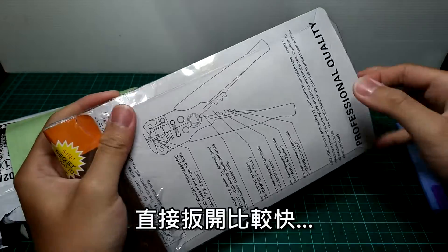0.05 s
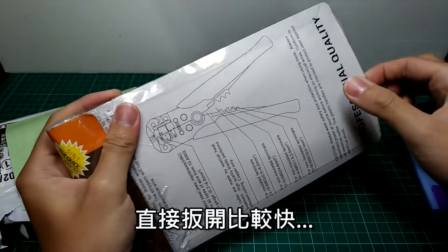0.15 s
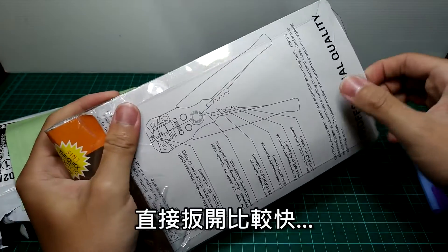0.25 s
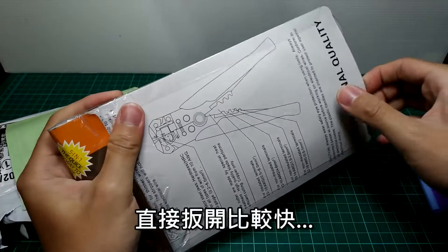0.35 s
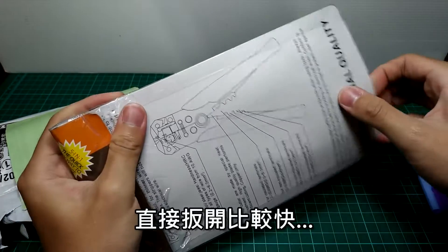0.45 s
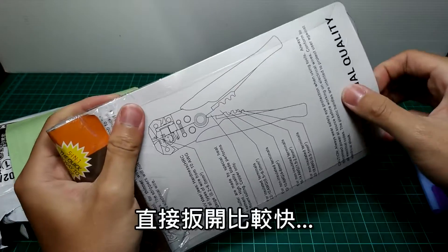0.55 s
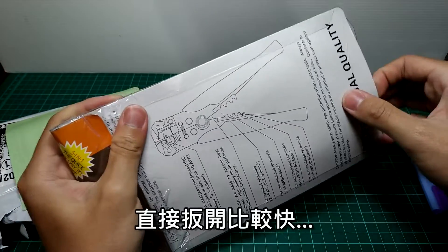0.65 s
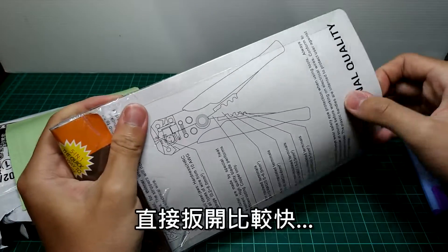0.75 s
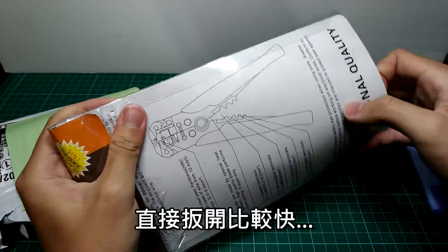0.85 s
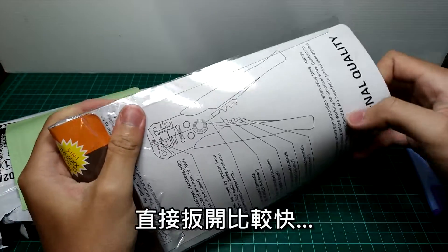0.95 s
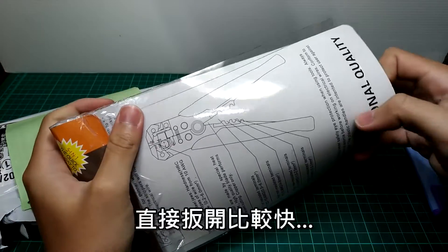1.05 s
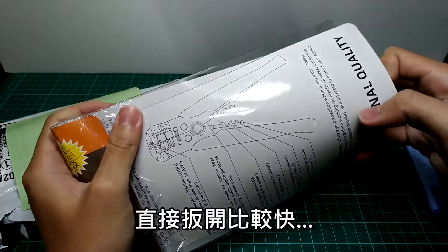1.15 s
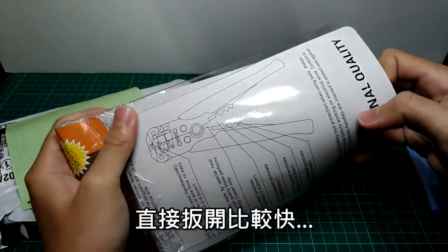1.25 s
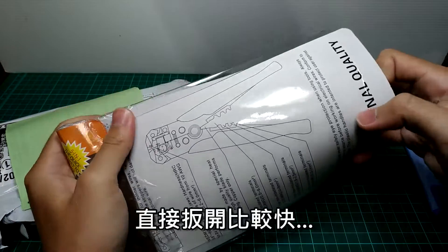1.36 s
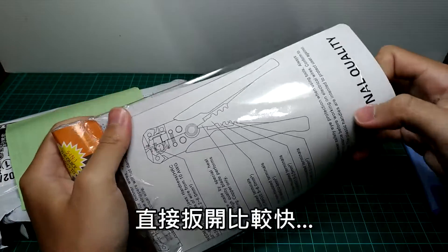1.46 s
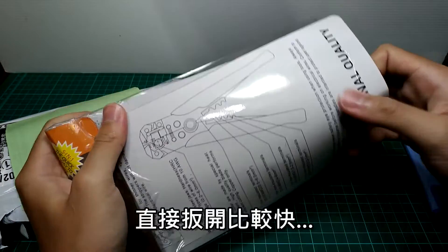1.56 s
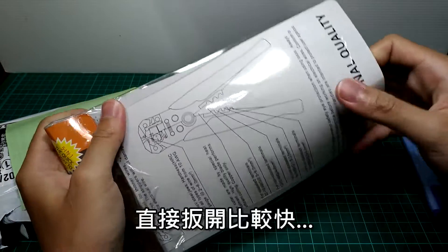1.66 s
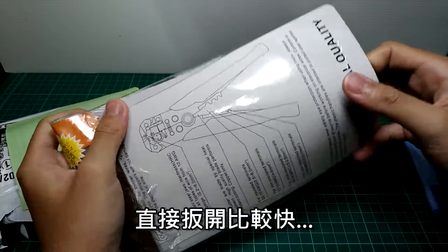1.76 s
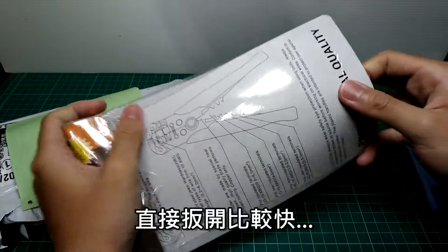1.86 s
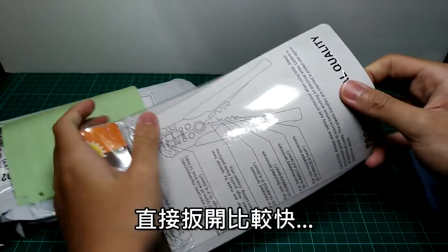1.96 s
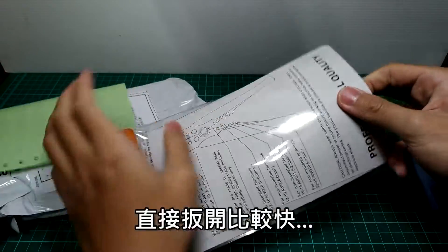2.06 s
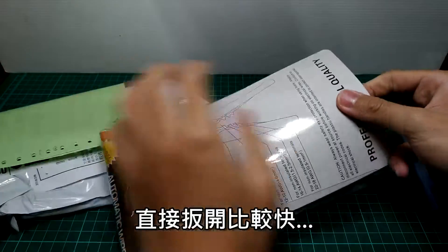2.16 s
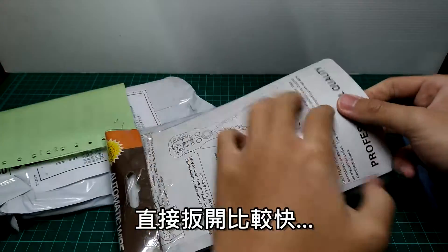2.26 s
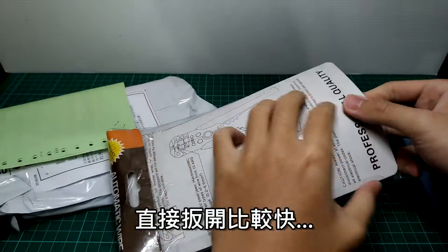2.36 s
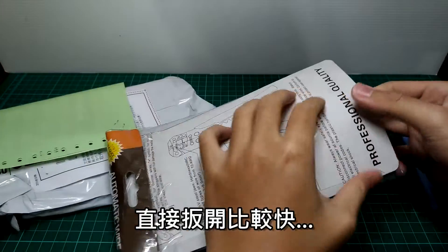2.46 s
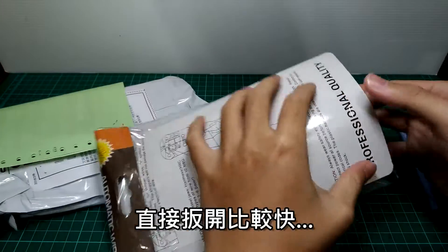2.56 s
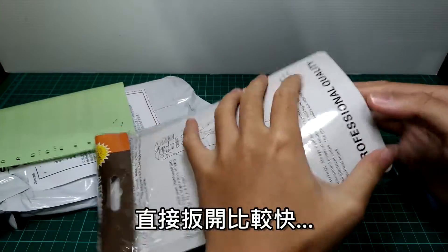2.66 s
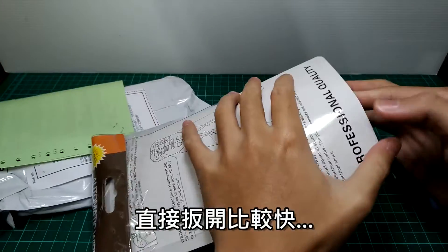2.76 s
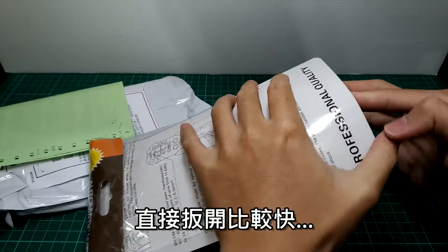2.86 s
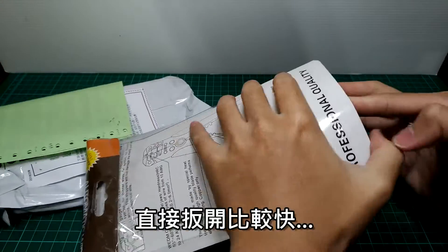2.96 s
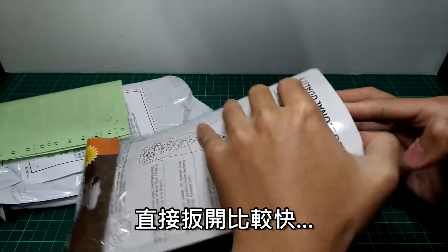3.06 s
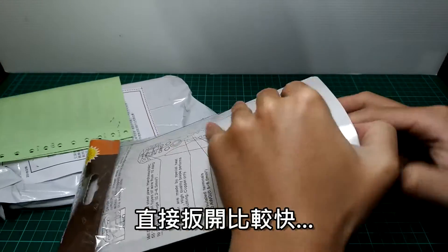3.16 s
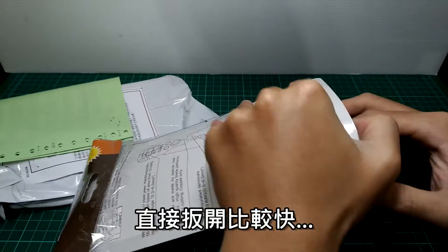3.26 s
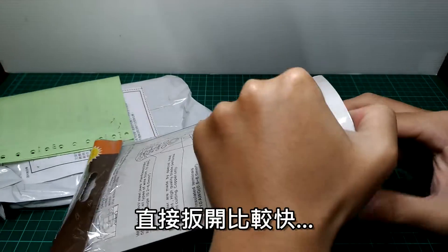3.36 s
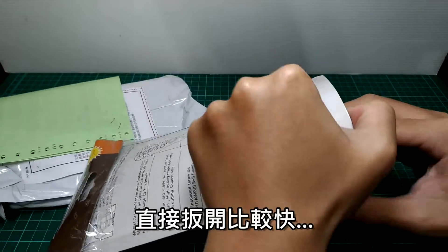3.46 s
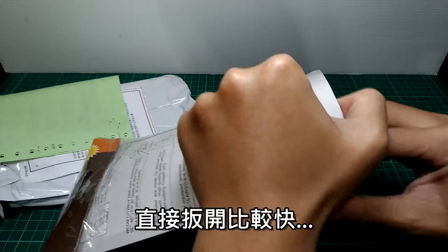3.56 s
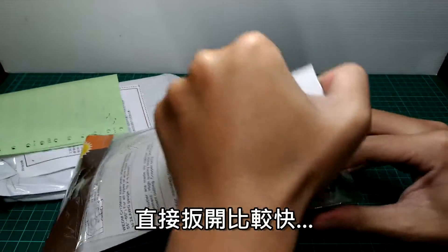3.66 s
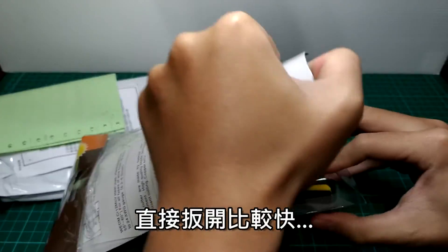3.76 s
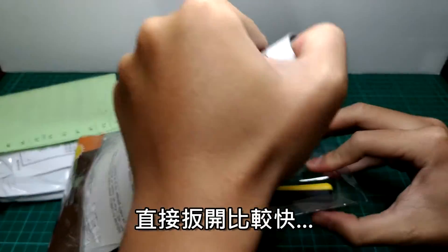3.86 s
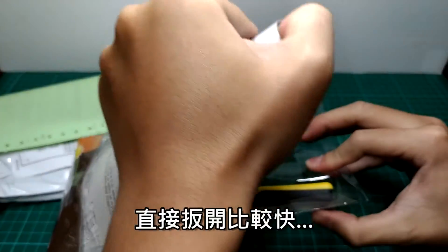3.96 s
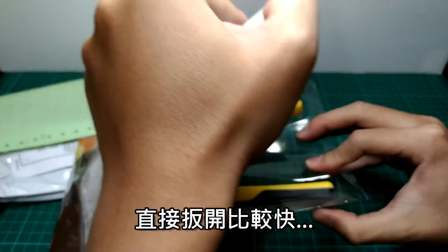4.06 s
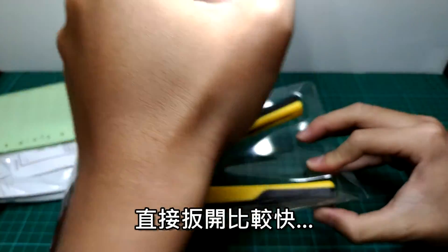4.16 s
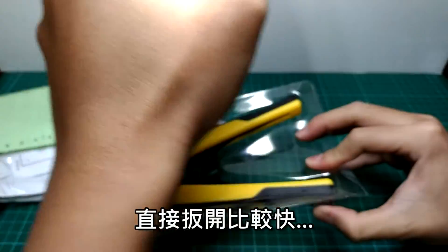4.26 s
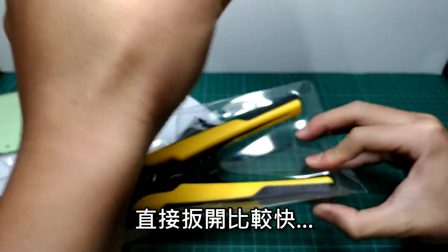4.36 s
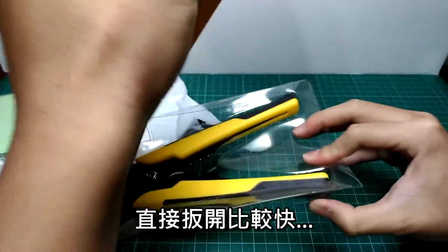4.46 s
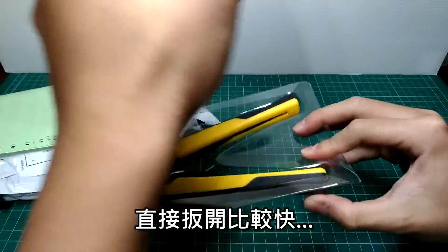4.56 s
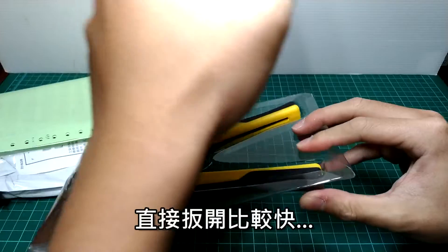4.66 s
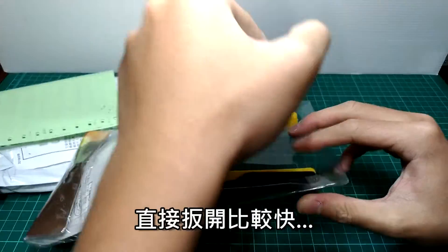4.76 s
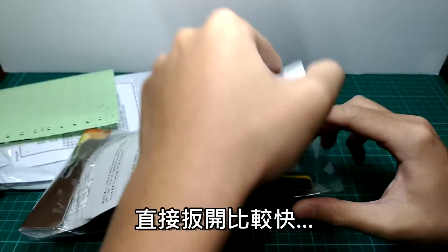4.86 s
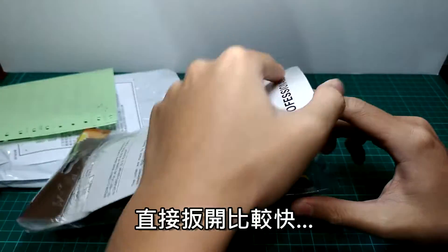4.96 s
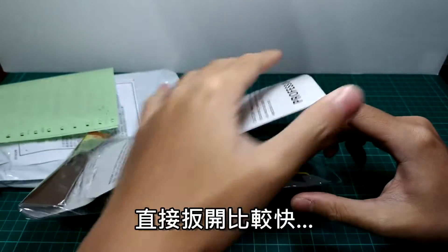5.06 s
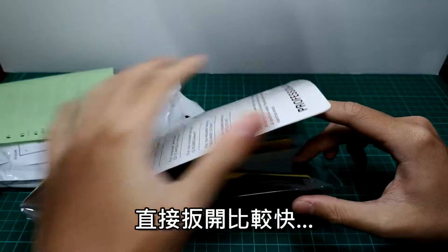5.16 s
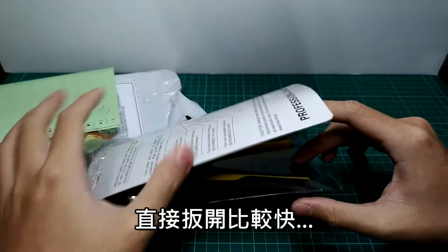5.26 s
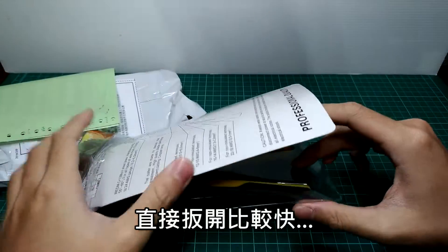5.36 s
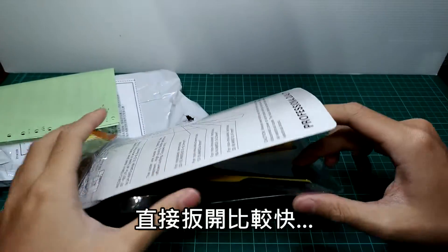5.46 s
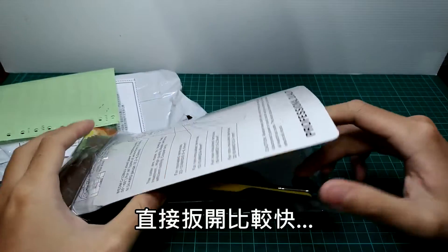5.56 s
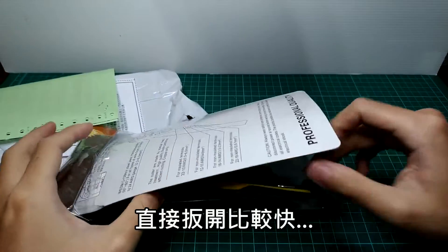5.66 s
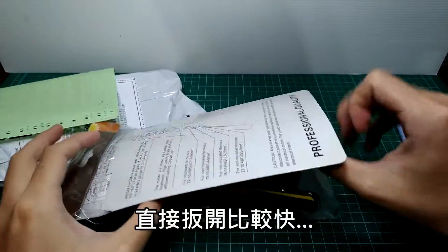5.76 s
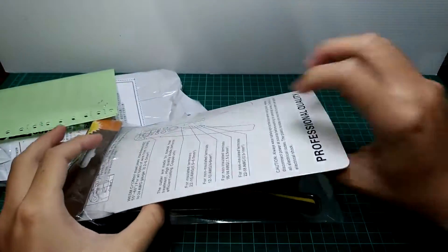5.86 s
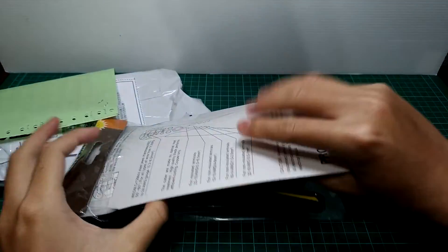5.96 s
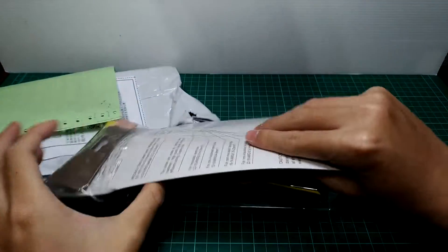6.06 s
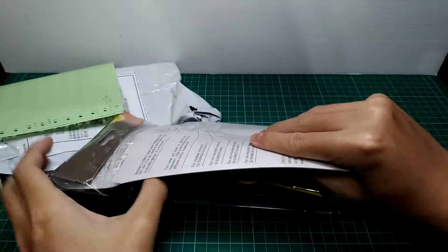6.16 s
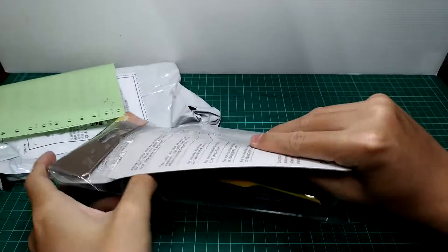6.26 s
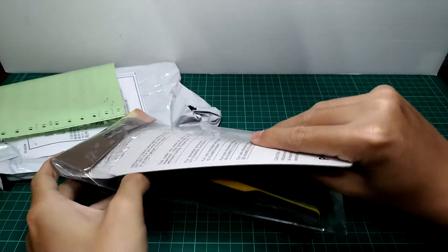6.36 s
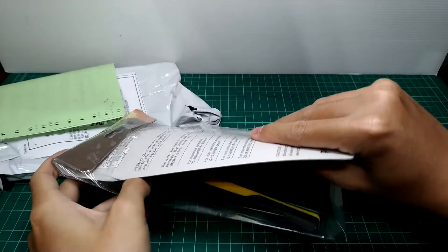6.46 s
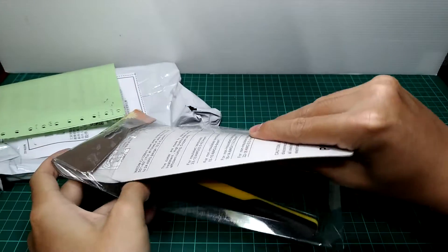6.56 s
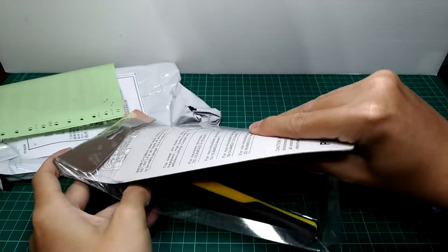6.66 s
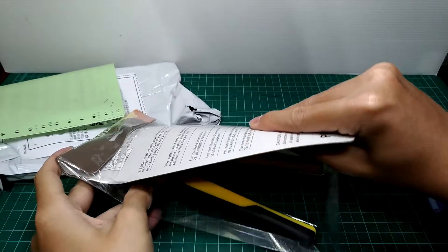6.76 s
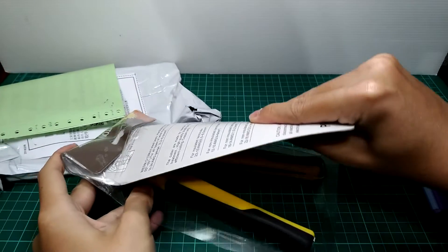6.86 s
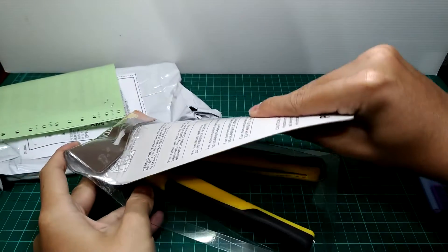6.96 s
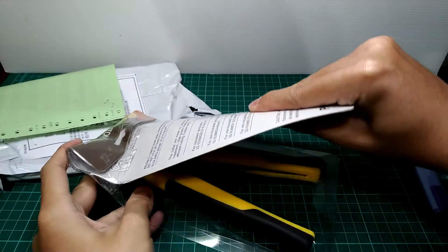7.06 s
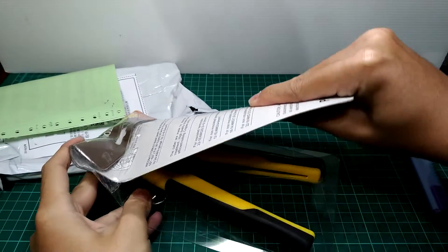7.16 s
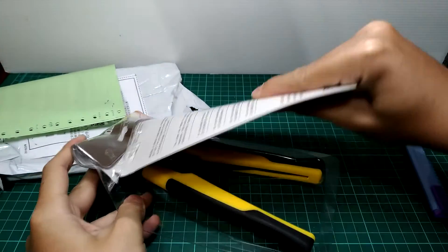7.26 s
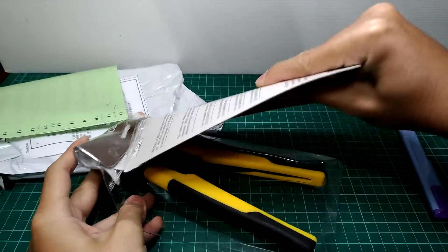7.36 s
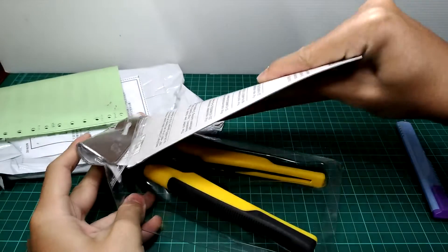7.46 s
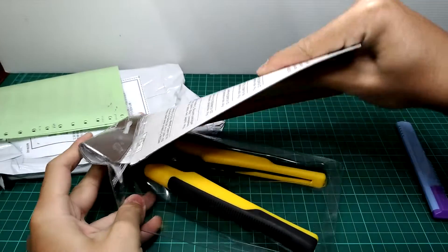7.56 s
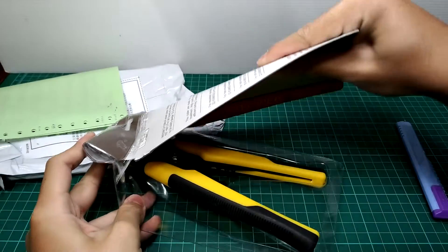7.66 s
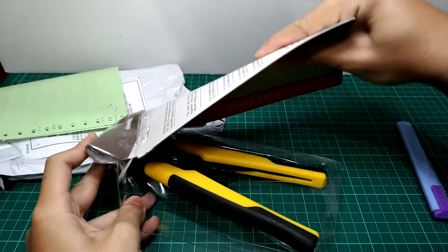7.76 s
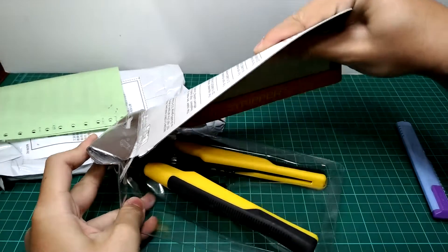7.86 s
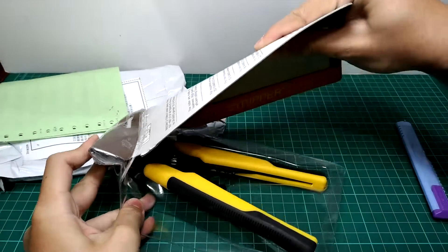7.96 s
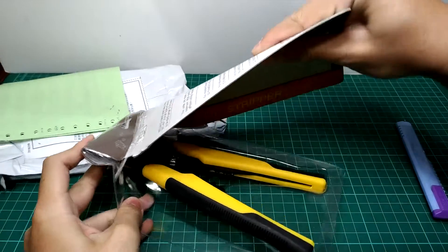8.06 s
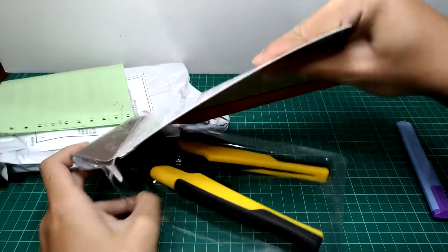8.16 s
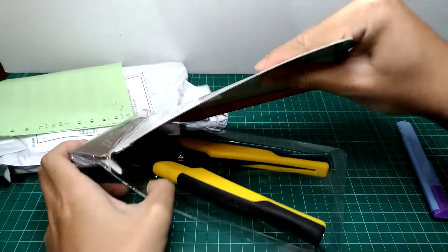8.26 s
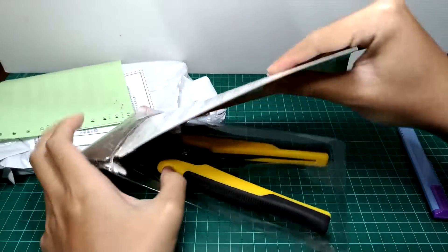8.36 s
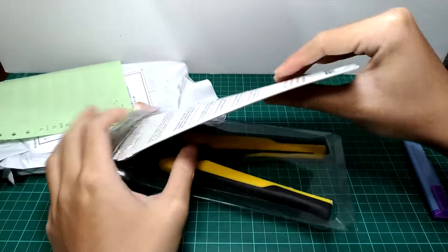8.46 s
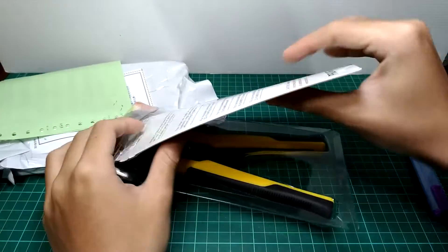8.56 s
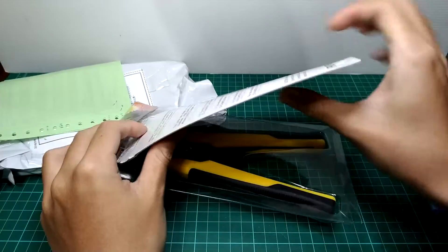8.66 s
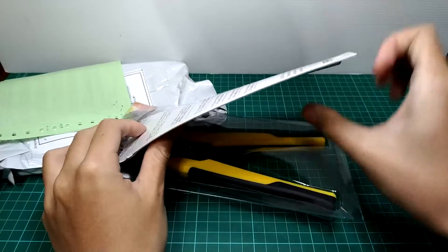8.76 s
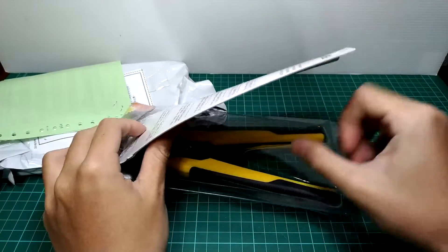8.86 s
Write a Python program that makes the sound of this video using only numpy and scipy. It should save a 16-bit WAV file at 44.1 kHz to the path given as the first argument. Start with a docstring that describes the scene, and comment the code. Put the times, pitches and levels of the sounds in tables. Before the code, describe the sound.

A blister pack is bent and pulled apart close to the microphone. Bright plastic clicks with a hollow, boxy ring come irregularly, strongest near the half second, just after four, at seven and just past eight. Between them fingers rub, card drags, groans and scrapes over plastic, and one uneven peel rips. Low bumps accompany some snaps; the room echo is short, the background quietly humming and hissing.

```python
"""A desk in a small room: hands pry a stiff plastic blister pack open, close to a stereo microphone.
Buckles are damped sines plus jagged noise bursts, ticks are bursts alone; shell and room ring on by convolution.
Friction is banded noise full of tiny slips; slips also ring card and panels, while squeak, groans and whistle
are gliding sines. The pack bumps the desk in low damped modes.
Room tone, mains hum and a thin electronic whine lie underneath."""
import sys
import numpy as np
from scipy import signal
from scipy.io import wavfile

SR = 44100
rng = np.random.default_rng(int(sys.argv[2]) if len(sys.argv) > 2 else 0)


def unload_audio(sound):
    """Save the sound as a 16-bit wav file, at the path given as the first command line argument."""
    columns = np.transpose(np.atleast_2d(sound))
    # keep every value between -1 and 1, then stretch to whole-number steps
    steps = np.round(np.clip(columns, -1, 1) * 32767)
    wavfile.write(sys.argv[1], SR, steps.astype(np.int16))


N = 393372
TIME = np.arange(N) / SR   # seconds
CENTRES = 31.25 * 2 ** np.arange(0, 9.5, .5)   # half-octave band centres, Hz


def from_db(db):
    """Decibels to gain."""
    return 10 ** (np.asarray(db) / 20)


def unit_energy(x):
    """Scale each stereo sound (.., 2, samples) to a mean energy of 1 a channel."""
    return x / np.sqrt(np.sum(x ** 2, axis=(-2, -1), keepdims=True) / 2 + 1e-20)


def at_hz(points, hz):
    """Read a table on a log-frequency axis."""
    table = np.array(points)
    return np.interp(np.log(hz), np.log(table[:, 0]), table[:, 1])


def between(anchors, levels, hz):
    """Level at hz from rows of levels that hold at the anchor frequencies."""
    weights = [np.interp(np.log(hz), np.log(anchors), row) for row in np.eye(len(anchors))]
    return np.array(weights) @ levels


def drift(rate):
    """Slow chance of spread about 1, with a new target `rate` times a second."""
    knots = rng.standard_normal(int(N / SR * rate) + 2)
    return np.interp(TIME * rate, np.arange(len(knots)), knots) * np.sqrt(3 / 2)


# How alike the two channels are. Each row: frequency in Hz, correlation (no unit).
LIKENESS = [(100, 0.92), (600, 0.75), (1300, 0.32), (2600, 0), (6000, 0.0087)]


def bands(drive):
    """Half-octave stereo bands of energy 1; neighbours take turns on two unrelated drives (2, .., 2, samples)."""
    for k, hz in enumerate(CENTRES):
        edges = hz * 2 ** np.array([-.25, .25])
        band_filter = signal.butter(2, edges, "band", fs=SR, output="sos")
        x = signal.sosfilt(band_filter, drive[k % 2] + 1e-18)
        alike = np.clip(at_hz(LIKENESS, hz), -.98, .98)
        middle = np.sqrt(1 + alike) * x[..., :1, :]
        side = np.sqrt(1 - alike) * x[..., 1:, :] * [[1], [-1]]
        yield hz, unit_energy(middle + side)


def swing(t, hz, t60, rise):
    """A damped sine that takes a moment to build up."""
    return np.sin(2 * np.pi * hz * t) * from_db(-60 * t / t60) * (1 - np.exp(-(t / rise) ** 2))


def placed(times, sounds):
    """Lay short stereo sounds on the time line."""
    out = np.zeros((2, N))
    for s, sound in zip(times, sounds):
        i = max(int(s * SR), 0)
        out[:, i:i + sound.shape[-1]] += sound[:, :N - i]
    return out


# Where a snap's thud, panel, crack and sizzle lie. Each entry: frequency in Hz.
SNAP_HZ = [260, 750, 2200, 8000]
# Colour common to all snaps. Each row: frequency in Hz, relative level in dB.
SNAP_COLOUR = [(90, -12.5), (180, -6.5), (400, 0), (1100, 7), (1500, 1), (3000, -1), (4400, 2), (6300, -3),
               (9500, 2), (15000, -4.5)]
# How fast the cracks die. Each row: frequency in Hz, t60 in seconds.
SNAP_T60 = [(200, 0.057), (900, 0.019), (3000, 0.018), (10000, 0.017)]
# The treble reaches the left microphone more directly. Each row: frequency in Hz, left minus right in dB.
LEAN = [(250, 0.5), (800, 1), (2000, 1.5), (12000, 2)]
SWING_STRETCH = 4.0   # seconds of t60 that a panel gains per second of buckle length


def snaps(rustle_db=-11.0, scatter_db=1.15, jagged_db=4.0, pop_t60=0.008, pop_rise=0.0008,
          pop_ring_db=-4.0, crack_rise=0.00031, wander_db=0.5):
    """A flipping panel swings at its own pitch, its crease bursts and rings; ticks burst only; shell and room ring on."""
    s, thud, panel, crack, sizzle, hold, ring_db = snap_levels()
    t = np.arange(SR // 16) / SR
    hold = hold[:, None, None]
    draws = rng.standard_normal((len(s), 5, len(t)))
    jag = from_db(jagged_db * draws[:, -1:]) * (1 - np.exp(-t / crack_rise))
    drive = np.stack([draws[:, :2], draws[:, 2:-1]]) * jag
    place_db = wander_db * rng.standard_normal((len(s), 1, 1))   # each crease lies somewhere else
    levels = np.array([thud, panel + rustle_db, crack, sizzle])
    cracks = 0
    for hz, band in bands(drive):
        if hz <= 80:
            continue
        decay_db = -60 * np.maximum(t - hold, 0) / at_hz(SNAP_T60, hz)
        burst = unit_energy(band * from_db(decay_db))
        level = between(SNAP_HZ, levels, hz) + at_hz(SNAP_COLOUR, hz)
        level = level + scatter_db * rng.standard_normal(len(s))
        # dull snaps keep falling toward the top
        level = level + np.minimum(sizzle - crack, 0) * max(np.log2(hz / SNAP_HZ[-1]), 0) / 2
        sides_db = (at_hz(LEAN, hz) + place_db) * np.array([[.5], [-.5]])
        cracks = cracks + burst * from_db(level[:, None, None] + sides_db) * np.sqrt(.5)

    # only buckles, which come first, ring at the crease and swing
    _, pitch, flip_db, _, _, crease_hz, *_ = np.transpose(BUCKLES)
    flips = len(pitch)
    cracks[:flips] += creases(t, crease_hz) * from_db(crack[:flips, None, None] + CREASE_DB)
    pops = np.zeros_like(cracks)
    # a slower buckle swings for longer
    pops[:flips] = swing(t, pitch[:, None, None], pop_t60 + SWING_STRETCH * hold[:flips], pop_rise)
    pops[:flips] = unit_energy(pops[:flips]) * from_db(flip_db)[:, None, None]
    passed_on = (cracks + from_db(pop_ring_db) * pops) * from_db(ring_db)[:, None, None]
    direct = placed(s, cracks + pops)
    # levels are means over the first few milliseconds
    return (direct + ring_on(placed(s, passed_on))) * np.sqrt(0.0063 * SR)


# A panel of the shell flips over and its crease cracks. Each row: start in seconds, panel pitch in Hz,
# panel level in dB, crack level in dB, crack tilt in dB per octave, crease pitch in Hz,
# length in seconds, level passed on to shell and room in dB.
BUCKLES = [(.2522, 730, -32.5, -34, -3, 1620, 0.0018, -5), (.4238, 792, -23.5, -23, -2, 2500, 0.0031, -4),
           (.4298, 790, -26, -37.5, -5, 1850, 0.001, -7), (.5389, 877, -15.5, -18.5, -4, 2364, 0.0037, -7),
           (.8407, 840, -27, -54, 5.5, 1760, .002, -6), (1.001, 880, -51, -35, -4.5, 1880, 0.0049, -7.5),
           (1.0894, 740, -33.5, -32, 0.5, 3630, .003, -7.5), (1.1345, 810, -29, -82, -6, 3580, .003, -4),
           (1.547, 960, -41.5, -47, -1, 2250, 0.0011, -4.5),
           (1.8207, 980, -24, -29.5, -20, 1590, .0012, -6.5),
           (2.039, 880, -46.5, -55, 0.5, 1840, 0.0018, -2),
           (2.4597, 1050, -36.5, -38, -8, 1370, 0.0013, -3.5),
           (2.51, 1010, -42.5, -46, -23, 1550, .001, -6), (2.9843, 975, -37.5, -46, -3.5, 2780, .002, -7),
           (3.592, 672, -32.5, -59, 11, 2460, 0.0018, -2.5), (3.795, 755, -42.5, -83, 8, 1410, 0.0027, 2),
           (4.2801, 780, -13.5, -24, -13.5, 1530, 0.0028, -8.5),
           (4.3963, 1140, -29.5, -29, 1, 2790, 0.0011, -5.5),
           (4.856, 1040, -34, -32.5, -9.5, 1430, 0.0025, -9.5),
           (4.8876, 1140, -29.5, -40, -14, 1500, 0.0016, -9.5),
           (5.124, 930, -49.5, -55.5, -1, 1910, 0.0014, -8),
           (5.4647, 970, -39, -40.5, -4.5, 1480, 0.0037, -4),
           (5.472, 810, -36.5, -48, -7, 1540, 0.0023, -8), (6.19, 1395, -49.5, -52, -17, 1410, 0.0066, -8),
           (6.6825, 1100, -31.5, -38.5, -6, 1510, 0.0014, -8),
           (6.997, 1155, -29.5, -26.5, 3, 2850, .002, -5.5),
           (7.0188, 910, -31.5, -24.5, -5, 2360, 0.0016, -4.5),
           (7.0243, 865, -33, -33, 2.5, 1430, 0.0022, -18), (7.0416, 1060, -18, -22, 3, 1480, .001, -6),
           (7.0548, 900, -17, -19, -3, 2154, .0015, -4), (7.37, 1200, -31, -35.5, -13, 1680, 0.00057, -4.5),
           (7.5429, 985, -24.5, -30, -1, 1645, .001, -7),
           (7.6913, 1120, -28, -34.5, -3.5, 1520, 0.00074, -9.5),
           (7.8955, 1200, -30.5, -24.5, 2, 3080, .0006, -7), (7.9438, 850, -32, -30, 0, 2280, .001, -8),
           (7.952, 860, -24, -24.5, -18.5, 1504, 0.0026, -15),
           (7.9716, 617, -24, -31, -18.5, 1560, 0.0026, -5.5),
           (8.125, 890, -24, -27.5, 1, 4030, 0.0027, -6), (8.1933, 1014, -16.5, -13.5, -6, 1670, .0007, -2),
           (8.733, 1120, -40.5, -44, -0.5, 3130, 0.0017, -3.5), (8.8696, 558, -23, -46, -5, 1640, .001, -2)]
# A crease or the seam gives way while the panels stay put.
# Each row: start in seconds, crack level in dB, tilt in dB per octave.
TICKS = [(0.189, -44.5, -3.5), (0.196, -46.5, -0.5), (0.483, -42.5, -11), (0.582, -46, -5),
         (0.765, -43, -2.5), (0.873, -53, 8), (1.034, -46.5, -13), (1.085, -43, -8), (1.122, -40, -2),
         (1.188, -32, -1.5), (1.5358, -45, 0), (1.6114, -32.5, -1), (1.779, -34.5, -3), (1.803, -49, -4),
         (2.848, -46, -9), (2.972, -53.5, -6), (3.386, -50, 6), (3.428, -40, -6), (3.4645, -30, 1.5),
         (3.629, -38.5, 3.5), (3.852, -47.5, 7), (4.3507, -30.5, -4.5), (4.427, -40, -13),
         (4.488, -56, 4.5), (4.521, -46, 2), (4.532, -46, -0.5), (4.556, -41, -4), (4.6018, -36.5, -7),
         (4.796, -49, -6), (5.1955, -44, -20), (5.356, -52.5, -12), (5.598, -58, -3), (5.774, -60, 3),
         (5.97, -53, -7), (6.269, -49.5, -6), (6.06, -44.5, 2), (6.099, -48, -17), (6.1818, -57, 7),
         (6.3328, -42.5, 1), (6.595, -49.5, 1.5), (6.628, -40.5, -4), (6.671, -44, 3), (6.956, -41.5, 0),
         (7.0318, -28.5, -1.5), (7.1694, -42, -1.5), (7.316, -46.5, 1.5), (7.3463, -38, 0.5),
         (7.7619, -51, 6), (7.804, -51, 7.5), (7.8566, -33, 2), (7.9145, -27, 3), (7.9252, -31, -3),
         (7.9574, -36, 0.5), (7.995, -49.5, 6.5), (8.05, -57.5, 7), (8.372, -41.5, -0.5), (8.434, -41, -28),
         (8.46, -37, 2), (8.485, -44.5, -0.5)]
# A flipping panel shoves the pack: the thud at a panel level of PANEL_DB, and its share of the panel's swing.
THUD_DB, PANEL_DB, THUD_FOLLOWS = -38, -28.5, 0.6
TICK_MIDDLE_DB, TICK_BASS_DB = -5.5, -25   # a tick has little weight: relative to its crack
TICK_S, TICK_RING_DB = .0009, -4.5   # a tick's length, and what it passes on to shell and room


def snap_levels():
    """Every buckle and tick as (s, thud dB, panel dB, crack dB, sizzle dB, length s, ring-on dB), per octave."""
    s, _, panel, crack, tilt, _, length, ring_db = np.transpose(BUCKLES)
    tick_s, tick, tick_tilt = np.transpose(TICKS)
    octaves = np.log2(SNAP_HZ[3] / SNAP_HZ[2])
    each = np.ones(len(tick))
    thud = THUD_DB + THUD_FOLLOWS * (panel - PANEL_DB)
    buckles = [s, thud, panel, crack, crack + tilt * octaves, length, ring_db]
    ticks = [tick_s, tick + TICK_BASS_DB, tick + TICK_MIDDLE_DB, tick, tick + tick_tilt * octaves,
             TICK_S * each, TICK_RING_DB * each]
    return np.hstack([buckles, ticks])


# Modes of the patch around a crease. Each row: multiple of its pitch (no unit), relative level in dB.
CREASE_MODES = [(1, 0), (1.44, -2), (2.1, -8)]
CREASE_DB = -3   # relative to the crack
CREASE_T60, CREASE_RISE_S = .012, 0.0004   # seconds


def creases(t, hz):
    """The stiff patch around each crease rings briefly in a few modes; energy 1."""
    phases = .7 * rng.standard_normal((len(CREASE_MODES), len(hz), 2, 1))
    modes = 0
    for (ratio, db), phase in zip(CREASE_MODES, phases):
        modes = modes + from_db(db) * np.sin(2 * np.pi * ratio * hz[:, None, None] * t + phase)
    return unit_energy(modes * from_db(-60 * t / CREASE_T60) * (1 - np.exp(-t / CREASE_RISE_S)))


# Lasting modes of the hollow shell. Each row: frequency in Hz, relative level in dB.
SHELL = [(905, 0), (1034, -4.5), (1427, 1.5), (1631, -3), (2370, -4), (3047, -7), (3480, -6.5)]
# How long the room rings. Each row: frequency in Hz, t60 in seconds.
ROOM_T60 = [(200, 0.14), (1400, 0.22), (12000, 0.2)]


def ring_on(x, room_db=-2.5, shell_db=-17.5, shell_t60=0.089, wall_db=-7.5, wall_s=0.0096,
            build_s=0.00666, treble_db=1.0):
    """An echo off the back wall, the diffuse tail of the room and the lasting modes of the shell."""
    t = np.arange(SR // 2) / SR
    tail = 0
    for hz, band in bands(rng.standard_normal((2, 2, len(t)))):
        shape_db = -60 * t / at_hz(ROOM_T60, hz) + treble_db * hz / SNAP_HZ[-1]
        tail = tail + band * np.sqrt(hz) * from_db(shape_db)
    echo = from_db(room_db) * unit_energy(tail * (1 - np.exp(-(t / build_s) ** 2)))
    modes = 0
    for hz, db in SHELL:
        ring = np.sin(2 * np.pi * (hz * t + rng.random((2, 1))))
        modes = modes + from_db(db - 60 * t / shell_t60) * ring
    echo += from_db(shell_db) * unit_energy(modes)
    # the wall echo reaches the right channel slightly later
    echo[[0, 1], [int(wall_s * SR), int(wall_s * SR * 1.04)]] += from_db(wall_db)
    return signal.fftconvolve(x, echo, axes=1)[:, :N]


# Where the body, rasp and hiss of friction lie. Each entry: frequency in Hz.
SLIDE_HZ = [550, 2200, 8000]
# Colour common to all sliding. Each row: frequency in Hz, relative level in dB.
SLIDE_COLOUR = [(90, -19.5), (200, -2.5), (330, -2.5), (500, -9), (900, 5.5), (1500, 2.5), (2600, 3),
                (4600, 4), (6500, 4), (10000, 3.5), (15000, 2.5)]


def sliding(level_db=-2.0, grains_per_s=600, grain_db=4.0, smooth=0.51, judder_db=2.0, patchy_db=2.5):
    """Friction: tiny slips over a smooth hiss, juddering as the fingers catch and let go."""
    s, body, rasp, hiss = friction()
    levels = np.array([body, rasp, hiss])
    slip_sizes = from_db(grain_db * np.minimum(rng.exponential(1, N), 4))
    slips = (rng.random(N) < grains_per_s / SR) * slip_sizes
    drive = rng.standard_normal((2, 2, N)) * (smooth + slips) * from_db(judder_db * drift(70))
    out = 0
    for hz, band in bands(drive):
        if hz <= 80:
            continue
        level = np.interp(TIME, s, between(SLIDE_HZ, levels, hz)) + at_hz(SLIDE_COLOUR, hz)
        # dull rubs keep falling toward the top
        dullness = np.interp(TIME, s, np.minimum(hiss - rasp, 0))
        level = level + dullness * max(np.log2(hz / SLIDE_HZ[-1]), 0) / 2
        out = out + band * from_db(level + patchy_db * drift(60))
    return out * np.sqrt(N / 2) * from_db(level_db)


# Short rubs, as fingers shift their grip and the card drags over the plastic.
# Each row: start in seconds, length in seconds, level in dB per octave before trims, tilt in dB per octave.
RUBS = [(0.01, 0.12, -58.5, -2), (0.155, 0.084, -57, -3.5), (0.216, 0.13, -59.5, 0.5),
        (0.474, 0.11, -55, -3), (0.608, 0.32, -58.5, -4.5), (0.807, 0.08, -42.5, -2.5),
        (0.978, 0.086, -53.5, 1.5), (1.059, 0.14, -58, -1.5), (1.328, 0.11, -55.5, -2.5),
        (1.418, 0.059, -60, -1.5), (1.709, .15, -52.5, 0.5), (1.87, 0.29, -65, 1),
        (2.199, 0.073, -55.5, 0.5), (2.279, 0.055, -57, -2), (2.327, 0.19, -59.5, -3),
        (2.525, 0.18, -62, -1), (3.696, 0.48, -62.5, 0.8), (4.4, 0.25, -58.5, -1),
        (4.652, 0.086, -50.5, -2.5), (4.779, 0.073, -50.5, -5), (5.28, 0.098, -57, -2.5),
        (5.425, 0.22, -64, -2.5), (5.641, 0.38, -65, 2.5), (5.744, 0.1, -54.5, -0.5),
        (5.806, 0.13, -52, 0.5), (5.93, 0.16, -62, 0), (6.036, 0.089, -53, -1), (6.662, 0.04, -57, -9),
        (7, 0.12, -47, 0.5), (7.159, 0.15, -60, 2.5), (7.378, 0.17, -64, 3), (7.637, 0.35, -59, -0.5),
        (7.877, 0.125, -49.5, -5), (8.001, 0.16, -56.5, -.5), (8.181, .13, -47.5, -2),
        (8.296, 0.17, -58, -2.5), (8.758, 0.1, -58.5, -2), (8.882, 0.093, -54.5, 1.5)]
HOLD_DB, HOLD_TILT_DB = -73, -1.5   # faint rustle of the held pack: level per octave, tilt per octave
# A rub swells, holds and fades through RUB_END_DB at its end.
RUB_ATTACK_S, RUB_END_DB, RUB_FADE_DB_PER_S = 0.032, -9.5, 378


def friction(peel_body_db=-6.5, peel_rasp_db=-5.0, peel_hiss_db=-7.5):
    """Holding, rubs and the long peel add up in power to (s, body dB, rasp dB, hiss dB), per octave."""
    s = TIME[::SR // 500]
    octaves = np.log2(np.array(SLIDE_HZ) / SLIDE_HZ[1])[:, None]
    power = from_db(HOLD_DB + HOLD_TILT_DB * octaves) ** 2
    for start, length, db, tilt in RUBS:
        fade_db = np.clip(RUB_END_DB - RUB_FADE_DB_PER_S * (s - start - length), -100, 0)
        stroke = np.clip((s - start) / RUB_ATTACK_S, 0, 1) * from_db(fade_db)
        power = power + (stroke * from_db(db + tilt * octaves)) ** 2
    when, body, treble = np.transpose(PEEL)
    peel = [body + peel_body_db, (body + treble) / 2 + peel_rasp_db, treble + peel_hiss_db]
    peel_gain = from_db([np.interp(s, when, db) for db in peel])
    power = power + peel_gain ** 2 * (s > when[0]) * (s < when[-1])
    return s, *(10 * np.log10(power))


def chafing(level_db=-1.5, slips_per_s=32, low_hz=330, high_hz=1900, cycles=28, lurch_db=4.0,
            top_db=-7.5, count=16):
    """The card lurches along; its coarser slips set the bent panels ringing briefly, each at its own pitch."""
    s, body, _, _ = friction()
    out = 0
    for hz in np.geomspace(low_hz, high_hz, count):
        hits = rng.random(N) < slips_per_s / SR
        slips = hits * rng.uniform(0.14, 1, (2, N)) * from_db(top_db * (hz / high_hz) ** 2)
        r = from_db(-60 * hz / (cycles * SR))   # falls 60 dB in `cycles` periods
        w = 2 * np.pi * hz / SR
        resonance = [1, -2 * r * np.cos(w), r * r]
        out = out + signal.lfilter([np.sin(w) * np.sqrt(w)], resonance, slips + 1e-18)
    lurching = unit_energy(out * from_db(lurch_db * drift(50))) * np.sqrt(N)
    return lurching * from_db(level_db + np.interp(TIME, s, body))


# The card is peeled off the tray in one long pull.
# Each row: time in seconds, body level in dB before trims, treble level in dB before trims.
PEEL = [(2.8, -63.5, -66.5), (2.863, -45, -50.5), (2.97, -50.5, -64.5), (2.988, -45.5, -47.5),
        (3.012, -47.5, -53.5), (3.298, -44.5, -63.5), (3.39, -33.5, -33.5), (3.49, -36, -45),
        (3.528, -54, -57.5), (3.588, -33.5, -60), (3.636, -52.5, -39), (3.7, -61, -58.5)]
# The card's modes while it is peeled. Each row: frequency in Hz, relative level in dB, t60 in seconds.
PEEL_MODES = [(448, -6, 0.058), (674, 3.5, 0.012), (963, -1.5, 0.05), (1710, -7.5, 0.021),
              (2400, -16, .012)]


def peeling(level_db=-2.0, slips_per_s=110, uneven=.8, size_db=4.0, lurch_db=3.5):
    """The glued seam lets go in an uneven chain of slips, each knocking the card's modes."""
    when, body, _ = np.transpose(PEEL)
    draws = rng.standard_normal((600, 2 + len(PEEL_MODES)))
    # slips_per_s is the inverse of the median gap
    times = when[0] + np.cumsum(np.exp(uneven * draws[:, 0])) / slips_per_s
    live = times < when[-1]
    out = np.zeros(N)
    for k, (hz, db, t60) in enumerate(PEEL_MODES):
        slips = np.zeros(N)
        sizes = size_db * (draws[live, 1] + draws[live, 2 + k] / 2)
        slips[(times[live] * SR).astype(int)] = from_db(db + sizes)
        r = from_db(-60 / (t60 * SR))
        w = 2 * np.pi * hz / SR
        out += (-1) ** k * signal.lfilter([1, 0, -1], [1, -2 * r * np.cos(w), r * r], slips + 1e-18)
    out = unit_energy(out * from_db(lurch_db * drift(50)) * np.ones((2, 1)))
    out = out * np.sqrt((when[-1] - when[0]) * SR)
    return out * from_db(level_db + np.interp(TIME, when, body))


# The card's edge scrapes over the hollow tray.
# Each row: start in seconds, end in seconds, level in dB, resonance in Hz.
SCRAPES = [(4.458, 4.555, -39, 1570), (5.289, 5.364, -42, 1470), (5.457, 5.581, -51, 1460),
           (5.801, 5.939, -41.5, 1620), (6.071, 6.118, -53, 1310)]


def scrapes(width_hz=600, catches_per_s=900, smooth=0.26):
    """Each stroke swells and fades; the edge catches in quick tiny slips that ring one resonance of the tray."""
    strokes = []
    for start, end, db, hz in SCRAPES:
        count = int((end - start) * SR)
        b, a = signal.iirpeak(hz, hz / width_hz, fs=SR)
        noise = rng.standard_normal(count) + rng.standard_normal((2, count))   # shared part + sides
        slips = noise * (smooth + (rng.random(count) < catches_per_s / SR))
        tone = signal.lfilter(b, a, signal.lfilter(b, a, slips))
        tone = unit_energy(tone) * np.sqrt(count)
        strokes.append(tone * np.sin(np.linspace(0, np.pi, count)) * from_db(db))
    return placed([row[0] for row in SCRAPES], strokes)


# A fingertip squeaks on the plastic. Each row: time in seconds, slip rate in Hz, level in dB before the colour.
SQUEAK = [(2.542, 1550, -68), (2.549, 1480, -54), (2.571, 1206, -58), (2.579, 733, -66),
          (2.612, 1113, -54.5), (2.645, 886, -55)]
# The sheet's response to the squeak. Each row: frequency in Hz, gain in dB.
SQUEAK_COLOUR = [(700, 12), (1300, 9.5), (2100, 3), (4200, -9)]


def squeak(wobble=0.0355, flutter_db=2.0):
    """Stick-slip: a rough gliding tone whose partials pass through the resonances of the sheet."""
    s, hz, db = np.transpose(SQUEAK)
    rate = np.interp(TIME, s, hz)
    phase = 2 * np.pi * np.cumsum(rate * (1 + wobble * drift(700))) / SR
    tone = 0
    for k in range(1, 5):
        partial_db = at_hz(SQUEAK_COLOUR, k * rate) + flutter_db * drift(200)
        tone = tone + np.sin(k * phase) * from_db(partial_db)
    return tone * np.interp(TIME, s, from_db(db), left=0, right=0)


# The card groans briefly as it drags.
# Each row: start in seconds, length in seconds, pitch in Hz, level in dB.
GROANS = [(0.988, 0.029, 860, -41.5), (2.387, 0.029, 809, -35), (2.912, 0.049, 456, -39),
          (3.207, 0.032, 147, -40), (3.23, 0.052, 310, -41), (3.327, 0.025, 910, -31.5),
          (8.422, .022, 1406, -44)]


def groans(wobble=0.058, overtone_db=-19):
    """For a moment the slips fall into step and a bent panel sounds one note that swells and fades."""
    notes = []
    for _, length, hz, db in GROANS:
        count = int(length * SR)
        phase = 2 * np.pi * np.cumsum(hz * (1 + wobble * drift(420)[:count])) / SR
        note = np.sin(phase) + from_db(overtone_db) * np.sin(2 * phase)
        note = note * np.sin(np.linspace(0, np.pi, count))
        notes.append(note * from_db(db) * np.ones((2, 1)))
    return placed([row[0] for row in GROANS], notes)


def crinkle(above_db=-3.0, ticks_per_s=36, crowding=1.2, size_db=2.0, t60=0.0061, low_hz=700, high_hz=4500):
    """Stray creases tick faintly and dry, louder and more often the harder the plastic is worked."""
    s, _, rasp, _ = friction()
    t = np.arange(SR // 32) / SR
    work = np.cumsum(from_db(crowding * rasp))
    # ticks crowd where the work grows fastest; ticks_per_s is the overall average
    times = np.interp(rng.random(int(ticks_per_s * N / SR)), work / work[-1], s)
    bursts = rng.standard_normal((len(times), 2, len(t))) * from_db(-60 * t / t60)
    band_filter = signal.butter(1, [low_hz, high_hz], "band", fs=SR, output="sos")
    bursts = unit_energy(signal.sosfilt(band_filter, bursts))
    sizes = size_db * np.minimum(rng.exponential(1, len(times)), 3)
    level = np.interp(times, s, rasp) + above_db + sizes
    return placed(times, bursts * from_db(level)[:, None, None]) * np.sqrt(t60 * SR / 2)


# Soft bumps of hands, pack and desk. Each row: start in seconds, level in dB, pitch in Hz.
BUMPS = [(0.249, -29.5, 157), (0.427, -24, 253), (.541, -17.5, 497), (1.137, -27.5, 240), (1.647, -35, 184),
         (1.826, -26.5, 105), (2.372, -35, 124), (2.471, -32.5, 89), (2.634, -39, 71.6), (4.809, -26, 203),
         (4.857, -28.5, 77.3), (7.042, -18.5, 75.4), (7.893, -21.5, 230), (7.952, -21.5, 295),
         (7.971, -30.5, 210)]


def bumps(t60=0.052, rise=0.00064, overtone=1.616):
    """Pack and desk answer a push with two low, damped modes, equally strong at first."""
    s, db, hz = np.transpose(BUMPS)
    t = np.arange(SR // 4) / SR
    hz = hz[:, None, None]
    thump = swing(t, hz, t60, rise) + swing(t, hz * overtone, t60 / 2, rise)
    return placed(s, thump * from_db(db)[:, None, None])


# A thin whistle as the hand slides off the plastic. Each row: time in seconds, pitch in Hz, level in dB.
WHISTLE = [(1.87, 6340, -68), (1.992, 6950, -59), (2.13, 6400, -69)]
WHISTLE_BLUR = .028   # spread of the pitch as a fraction


def whistle(overtone_db=-3):
    """A thin, slightly rough whistle and its octave swell, arch in pitch and fade."""
    s, hz, db = np.transpose(WHISTLE)
    pitch = np.interp(TIME, s, hz) * (1 + WHISTLE_BLUR * drift(2000))
    phase = 2 * np.pi * np.cumsum(pitch) / SR
    tone = np.sin(phase) + from_db(overtone_db) * np.sin(2 * phase)
    return tone * np.interp(TIME, s, from_db(db), left=0, right=0)


# Room tone. Each row: frequency in Hz, level in dB per octave.
ROOM_TONE = [(30, -72), (48, -54), (130, -63), (300, -72.5), (900, -88), (2000, -71.5), (10000, -72),
             (15000, -71)]
MAINS_HZ = 60


def background(hum_db=-65.0, whine_hz=9520, whine_width_hz=110, whine_db=-62.5):
    """Banded noise as room tone, a sine as mains hum and resonant noise as a narrow, unsteady electronic whine."""
    tone = 0
    for hz, band in bands(rng.standard_normal((2, 2, N))):
        tone = tone + band * from_db(at_hz(ROOM_TONE, hz))
    tone = tone * np.sqrt(N / 2)
    b, a = signal.iirpeak(whine_hz, whine_hz / whine_width_hz, fs=SR)
    whine = unit_energy(signal.lfilter(b, a, rng.standard_normal((2, N)))) * np.sqrt(N)
    hum = np.sqrt(2) * np.sin(2 * np.pi * MAINS_HZ * TIME)
    return tone + from_db(hum_db) * hum + from_db(whine_db) * whine


def scene(left_db=0.5):
    """The pack in the hands, just left of centre; all but the snaps share one left-right balance."""
    rubbing = sliding() + chafing() + peeling() + scrapes() + squeak() + groans()
    rest = rubbing + crinkle() + bumps() + whistle() + background()
    return snaps() + rest * from_db([[left_db], [-left_db]])


CUTOFF_HZ = 16000


def record(dry, low_cut_hz=38):
    """The microphone drops the deepest bass; the hardest peaks are rounded softly, and the top is cut steeply."""
    x = signal.sosfilt(signal.butter(8, low_cut_hz, "high", fs=SR, output="sos"), dry)
    x = x / (1 + (x / .78) ** 6) ** (1 / 6)   # soft ceiling
    return signal.sosfilt(signal.ellip(10, .2, 95, CUTOFF_HZ, fs=SR, output="sos"), x)


dry = scene()
out = record(dry)
unload_audio(out)
```